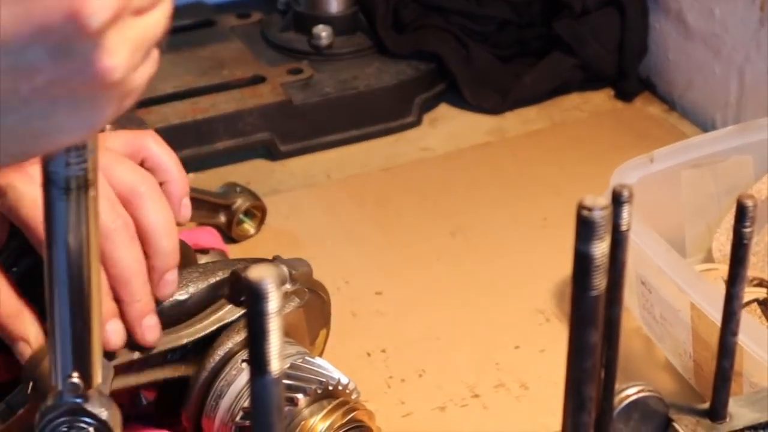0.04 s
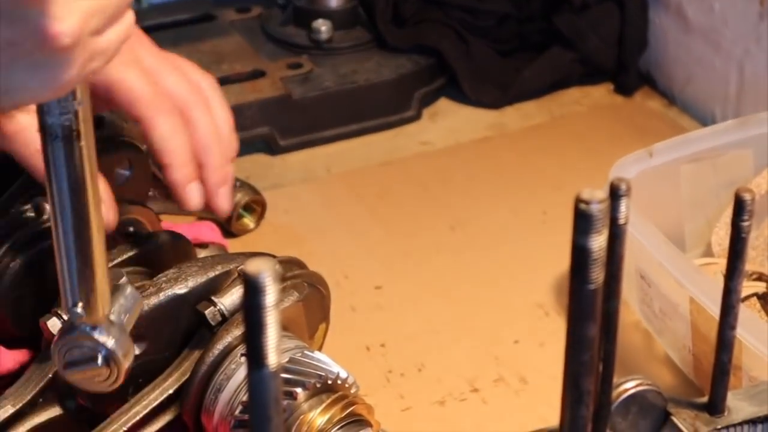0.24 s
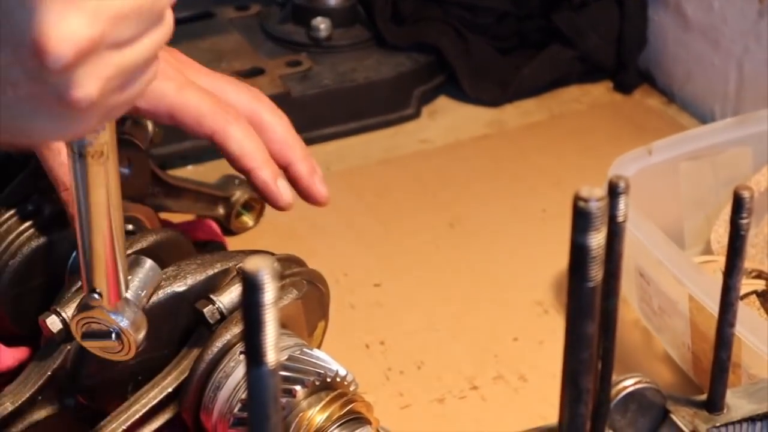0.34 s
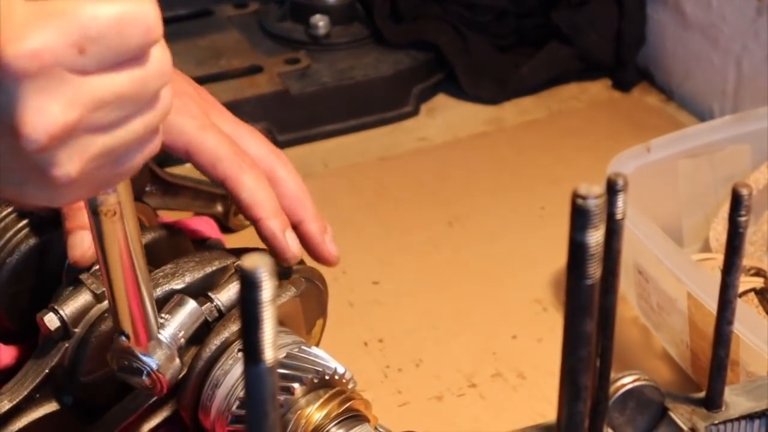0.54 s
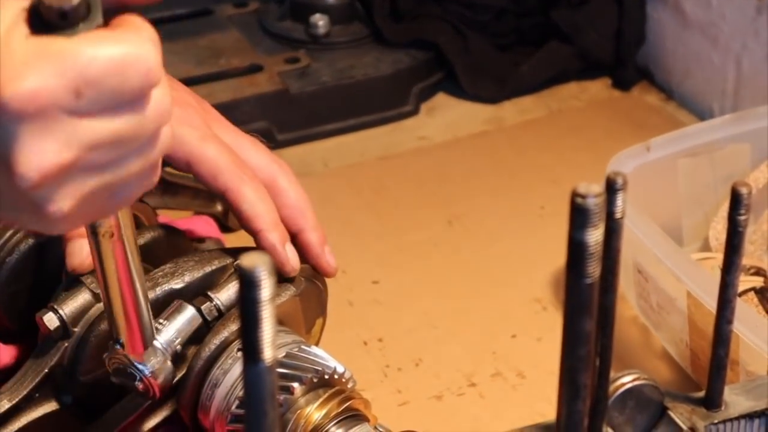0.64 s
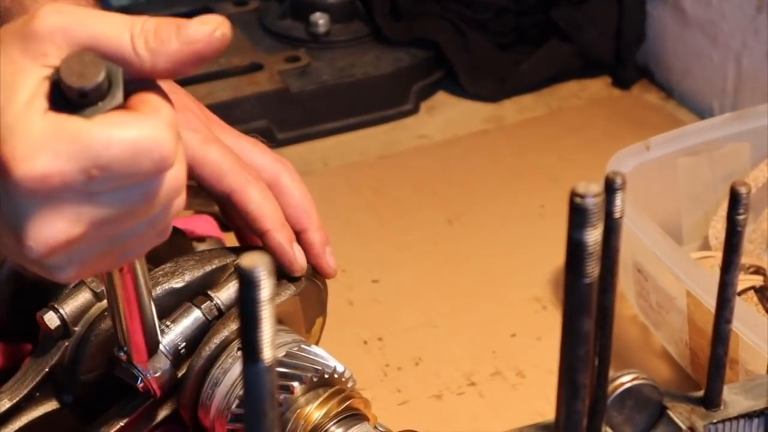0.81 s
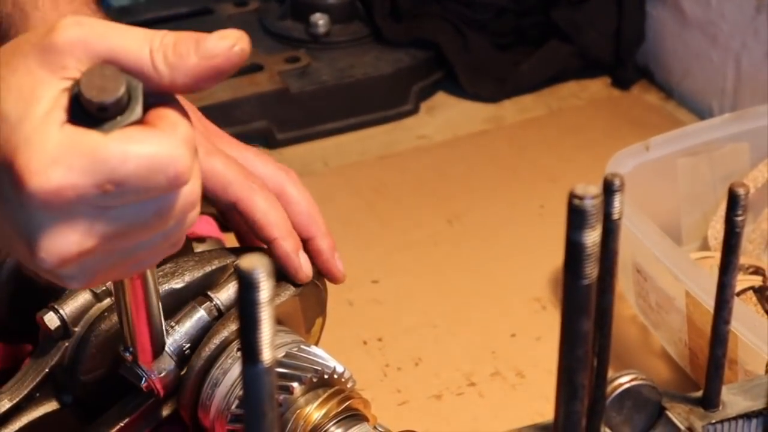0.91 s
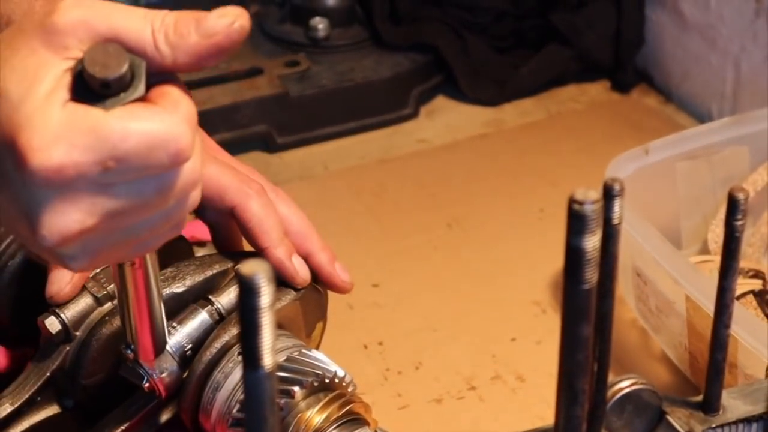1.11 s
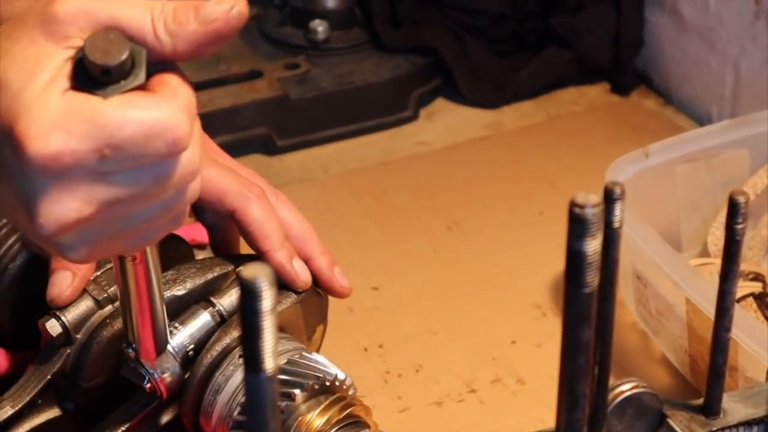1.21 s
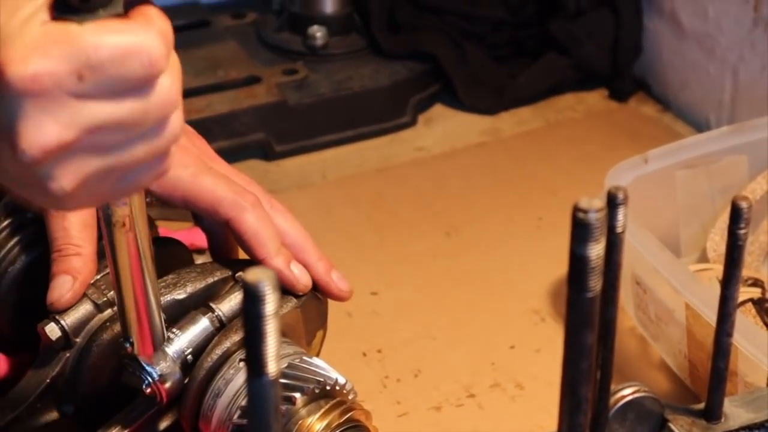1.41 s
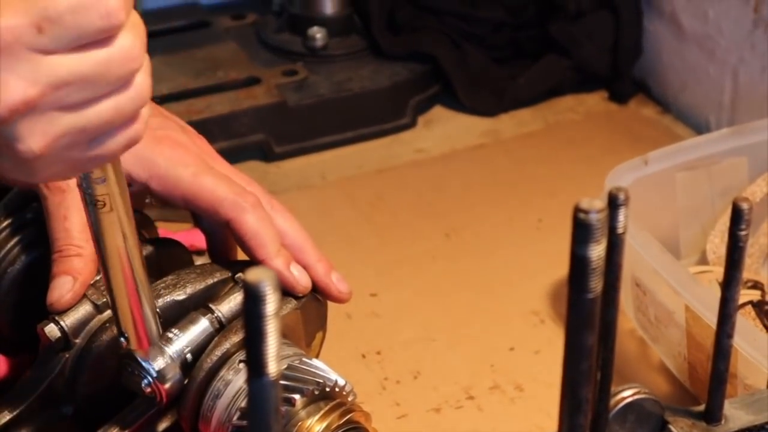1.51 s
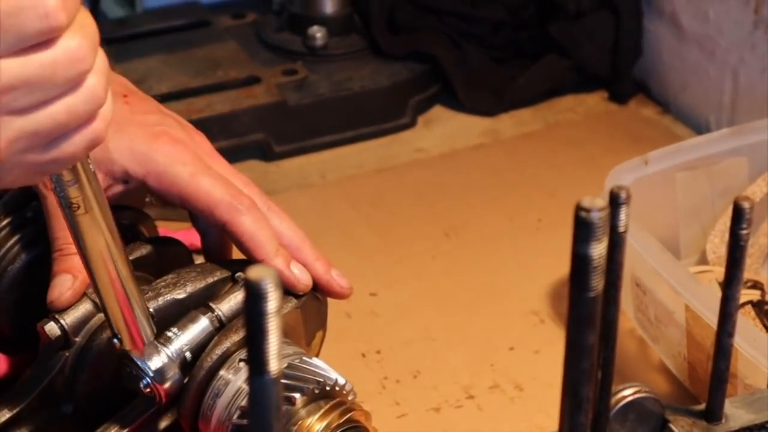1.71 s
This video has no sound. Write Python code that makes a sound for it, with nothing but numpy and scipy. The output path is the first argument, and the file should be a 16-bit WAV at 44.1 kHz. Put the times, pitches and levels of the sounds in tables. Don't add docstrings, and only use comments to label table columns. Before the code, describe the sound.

Heavy steel part thuds onto a wooden bench, then a socket scrapes and a wrench clicks

```python
import sys
import numpy as np
from scipy import signal
from scipy.fft import rfft, irfft
from scipy.io import wavfile
from scipy.ndimage import uniform_filter1d

SR = 44100
rng = np.random.default_rng(int(sys.argv[2]) if len(sys.argv) > 2 else 0)


def invert_db(level):
    return 10 ** (np.asarray(level, dtype=float) / 20)


def store_wav(level_fs):
    pcm = np.round(np.clip(np.atleast_2d(level_fs), -1, 1) * 32767)
    wavfile.write(sys.argv[1], SR, pcm.T.astype(np.int16))


N = 77175
t = np.arange(N) / SR


def curve(table, col=1):
    a = np.array(table, float)
    return np.interp(t, a[:, 0], a[:, col])


def unit(x):
    return x / np.sqrt(np.mean(x ** 2))


def cut(x, order, hz, kind="low"):
    return signal.sosfilt(signal.butter(order, hz, kind, fs=SR, output="sos"), x)


def ring(x, hz, t60_s):
    pole = np.exp(2j * np.pi * hz / SR - np.log(1000) / (t60_s * SR))
    return signal.lfilter([1], [1, -pole], x).imag


def body(x, modes):
    return sum(invert_db(db) * ring(x, hz, t60_s) for hz, db, t60_s in modes)


def colour(x, table):
    a = np.array(table, float)
    f = np.arange(N // 2 + 1) * SR / N + 1
    gain_db = np.interp(np.log(f), np.log(a[:, 0]), a[:, 1])
    return irfft(rfft(x) * invert_db(gain_db), N)


def walk(rate_hz):
    k = int(SR / rate_hz)
    steps = np.repeat(rng.standard_normal(N // k + 1), k)
    return unit(uniform_filter1d(uniform_filter1d(steps, k), k)[:N])


def grains(per_s, scatter_db):
    when, sign, size = rng.random((3, N))
    level_db = scatter_db * np.minimum(-np.log(size + 1e-9), 3.5)
    return (when < per_s / SR) * np.sign(sign - .5) * invert_db(level_db)


def push(s, ms):
    p = np.sin(np.pi * np.clip((t - s) / (ms / 1000), 0, 1))
    return p / p.sum()


def burst(s, ms):
    return (t >= s) * np.exp(-np.maximum(t - s, 0) / (ms / 1000))


# f/Hz, level/dB per Hz
SHOP = [(35, -60), (60, -9.5), (119, -20), (246, -12), (318, -20.5), (983, -13), (2140, -33), (15000, -45),
        (16500, -54)]


def room_tone():
    level_db, flicker_db = -44, 0.24
    f = np.arange(N // 2 + 1) * SR / N + 1
    base = rfft(colour(rng.standard_normal(N), [(15, -11.0), (45, -34.0)] + list(SHOP)))
    out = np.zeros(N)
    for hz in 16 * 2. ** np.arange(11):
        band = np.cos(np.pi / 2 * np.clip(np.log2(f / hz), -1, 1)) ** 2
        out += irfft(base * band, N) * invert_db(flicker_db * walk(6.95))
    return unit(out) * invert_db(level_db)


def hum():
    mains_hz, level_db, wobble_db, second_db = 50, -49.2, 1.1, -14
    phase = 2 * np.pi * mains_hz * t + 0.052 * walk(6.5)
    wave = np.sin(phase) + invert_db(second_db) * np.sin(2 * phase)
    return 2 ** .5 * invert_db(level_db + wobble_db * walk(11.3)) * wave


# t/s, level/dB
RUSTLE = [(0, -69), (.045, -44), (.09, -50), (.165, -43), (.21, -46), (.26, -34), (.32, -45), (.42, -50),
          (.7, -96), (.9, -53), (1.0, -44), (1.15, -53.5), (1.3, -52), (1.75, -99)]
# f/Hz, level/dB per Hz
RUSTLE_COLOUR = [(800, 11.5), (1700, 10.5), (3000, 2.5), (4200, 0), (5400, 1.5), (7000, -14), (16000, -15)]


def rustle():
    grain_per_s, scatter_db, flicker_db = 6000, 2.4, 1.2
    cloth = unit(colour(grains(grain_per_s, scatter_db), RUSTLE_COLOUR))
    return cloth * invert_db(curve(RUSTLE) + flicker_db * walk(38.9))


TICKS_S = [.0425, .1984, .2008, .2832, .3306, .7932, .8035, .8065, .8160, .8541, .9482, .9492, .9505, .9530,
           .960, .982, 1.2855, 1.595, 1.721]
# level/dB, low clack f/Hz, high clack f/Hz, chatter/ms, ring level/dB
TICKS = [(-42.5, 1500, 2100, 9.9, -17), (-18, 3640, 5220, 0.84, -32), (-21, 2540, 4530, 1.8, -30),
         (-30, 4000, 5620, 2.1, 7), (-38.5, 4150, 4320, 3.1, -22), (-29, 3200, 5600, 0.47, 0),
         (-27.5, 2880, 4700, 0.53, -30), (-35, 1920, 4600, 2.7, -10), (-30.5, 3830, 5600, 1.4, 3),
         (-33, 2600, 3300, .5, -16), (-27, 2700, 3600, .7, 0), (-25, 3150, 5700, .6, 0),
         (-35, 4540, 7200, 3, -3), (-29, 1100, 1600, 2.5, 2), (-39, 3080, 5500, 4, -6),
         (-42, 2800, 5400, 3, -10), (-46.5, 2830, 3280, 3.2, -12), (-54, 2600, 3600, 1.5, -20),
         (-50.5, 2200, 3300, 4.7, -20)]
# f/Hz, level/dB, t60/s
STEEL = [(930, -4, .05), (1272, 2, .04), (1870, -14, .03), (2650, 8, .018), (3080, -6, .03),
         (3616, -2, .04), (4200, -10, .02), (4540, 0, .018), (5400, 0, .022), (5610, -8, .03),
         (6350, -6, .012), (7700, -2, .018), (8230, -6, .02), (9800, -5, .02)]
# f/Hz, level/dB per Hz
SNAP = [(600, -8), (1500, -3), (2300, -6), (3200, 2), (6000, 1), (10000, -6), (12000, -18), (16000, -22)]


def ticks():
    rise_ms, clack_t60_s, ring_octaves = .15, .0055, .4
    snap_db, snap_hz = -.5, 5470
    out = np.zeros(N)
    noise = np.sign(rng.standard_normal(N)) * rng.uniform(0.7, 1, N)
    for s, (db, low_hz, high_hz, ms, ring_db) in zip(TICKS_S, TICKS):
        a = int(s * SR) - 40
        span = slice(a, a + 6000)
        chatter = noise * (burst(s, ms) - burst(s, rise_ms))
        hit = chatter[span]
        snap = unit(colour(chatter, SNAP)[span])
        clack, tone = 0, 0
        for hz in (low_hz, high_hz):
            clack = clack + unit(ring(ring(hit, hz, clack_t60_s), hz, clack_t60_s))
        for hz, mode_db, t60_s in STEEL:
            octaves = min(abs(np.log2(hz / low_hz)), abs(np.log2(hz / high_hz)))
            near_db = mode_db - 10 * (octaves / ring_octaves) ** 2
            tone = tone + invert_db(near_db) * ring(hit, hz, t60_s)
        y = clack + invert_db(ring_db) * unit(tone) + invert_db(snap_db) * (high_hz / snap_hz) ** 2 * snap
        out[span] += y * invert_db(db + 8) / np.abs(y).max()
    return out


# t/s, level/dB
CRACKS = [
    (0.1983, -3.5),
    (0.2851, -24.5),
    (.3305, -32),
]


def cracks():
    level = sum(invert_db(db) * burst(s, 0.3) for s, db in CRACKS)
    return cut(rng.standard_normal(N) * level, 2, 11000)


# t/s, level/dB, contact/ms
BLOWS = [(.1984, -.7, .15), (.2008, -2.3, 5.7), (.2088, -18, 1.3), (.2241, -31, .7), (.2326, -32, 1.2),
         (.238, -19.6, 2.5), (.2463, -13.6, 6), (.252, -23, 2), (.2591, -22.6, 2.9), (.2651, -29.4, 2.1),
         (.2689, -16.8, 1.9), (.2836, -12.5, 1.05), (.2839, -23, .3), (.2967, -25, 2.2), (.3048, -29, 1.1),
         (.3092, -11.7, 7.2), (.3216, -19.6, 6.8), (.3299, -14.2, 1.9), (.3305, -29, .4),
         (.3326, -14.8, 4.4), (.3571, -21, 1.7), (.3589, -14.7, 6.1), (.3758, -30.6, 2), (.4074, -37, 2),
         (.4272, -37.6, 2.3), (.4447, -35, 2.9)]
# t/s, level/dB, contact/ms
JOLTS = [
    (0.815, -34, 2.7),
    (0.832, -29, 4.9),
    (0.9547, -38.5, 0.46),
    (.998, -41, 3.7),
]
# f/Hz, level/dB, t60/s
BENCH = [(140, 1.2, .078), (180, -3.1, .093), (204, -10, .12), (250, -7, .03), (276, -20, .3),
         (342, -20, .15), (422, -6, .06), (458, -10, .06), (517, -2.8, .074), (547, .9, .029),
         (604, .5, .023), (678, -14.3, .097), (1052, -15, .07),
         (780, -18, 0.025), (1360, -11, 0.02), (2010, -22, 0.028), (2480, -29, .012)]
# f/Hz, level/dB, t60/s
FRAME = [(79, -17, .6), (98, -3.7, .39), (124, -23.5, .4), (129, -16, .33)]


def knocks():
    hits = BLOWS + JOLTS
    top = sum(invert_db(db) * push(s, ms) for s, db, ms in hits)
    frame = sum(invert_db(db) * push(s, 12.9) for s, db, ms in hits)
    return body(top, BENCH) + body(frame, FRAME)


# t/s, level/dB
ROCKING = [(.205, -24), (.225, -18.5), (.27, -19), (.295, -19.5), (.33, -24), (.375, -26), (.39, -35),
           (.45, -36), (.5, -44)]
# f/Hz, level/dB, t60/s
SHUDDER = [(80, 2, .2), (106, 1, .15), (216, 0, .06), (255, 8, .045), (300, 5, .05), (360, 2, .06),
           (405, 0, .06), (740, -2, .03), (870, -2, .04), (988, -3, .04), (1150, -4, .03), (1530, -10, .02)]


def rocking():
    tap_per_s, scatter_db, tap_ms = 440, 1.9, 0.41
    soft = np.hanning(int(tap_ms * SR / 1000) + 2)
    taps = np.convolve(grains(tap_per_s, scatter_db), soft)[:N]
    gate = (t > .208) * np.clip((.56 - t) / 0.19, 0, 1)
    return unit(body(taps, SHUDDER)) * invert_db(curve(ROCKING) - 2) * gate


def bench():
    return cut(knocks() + rocking(), 4, 81.4, "high") + cracks()


# t/s, skitter level/dB, rub level/dB
DRAG = [(.41, -39.5, -42), (.44, -51.5, -50), (.455, -46, -47), (.475, -38, -43.5), (.51, -37, -40.5),
        (.532, -31, -31.5), (.56, -37, -33), (.6, -56.5, -52), (.66, -79, -80)]
# f/Hz, width/Hz, level/dB
DRAG_BODY = [(920, 60, 12), (1213, 130, 16), (1514, 210, 17.5), (1730, 400, 17)]
# f/Hz, level/dB per Hz
DRAG_WIDE = [(700, -14.5), (2000, 5.5), (2900, 0), (3700, -1), (4600, -10), (5400, -8.5), (8000, -22),
             (16000, -30.5)]


def rub(g):
    socket = sum(invert_db(db) * np.sqrt(w) * ring(g, hz, 5.9 / w) for hz, w, db in DRAG_BODY)
    dull = unit(socket) * invert_db(curve(DRAG, 2) + 2.5)
    bright = unit(colour(g, DRAG_WIDE)) * invert_db(curve(DRAG) + 4.5)
    fade = np.clip((t - .385) / 0.065, 0, 1) * np.clip((.69 - t) / 0.085, 0, 1)
    return (dull + bright) * invert_db(0.4 * walk(89.3)) * fade


SLIPS_S = [.405, .4561, .4612, .4731, .4755, .501, .5455]
SLIPS = [-42, -20, -24.5, -16, -28, -35, -33]


def slips():
    force = sum(invert_db(db) * push(s, 0.25) for s, db in zip(SLIPS_S, SLIPS))
    click = cut(4.7 * force, 2, 900, "high")
    return click + 1.0 * ring(force, 1700, 0.0034) + 1.26 * ring(force, 4240, 0.0037)


def creak(g):
    start_s, end_s, fade_s = 0.99, 1.196, 0.053
    fade = np.clip(np.minimum(t - start_s, end_s - t) / fade_s, 0, 1)
    return unit(ring(g, 1720, 0.12)) * invert_db(-55) * fade


def drag():
    g = grains(17000, 0.5)
    return rub(g) + slips() + creak(g)


def room(x, db, t60_s):
    k = t[100:int(.5 * SR)]
    wash = cut(rng.standard_normal(len(k)), 1, 4300) * 1000. ** (-k / t60_s)
    ir = np.r_[np.zeros(100), wash / np.sqrt(np.sum(wash ** 2))]
    return signal.fftconvolve(x, ir)[:N] * invert_db(db)


def scene():
    steel = ticks()
    near = bench() + steel + drag()
    tick_tail = room(steel, -13, 0.05)
    reflections = room(cut(near, 2, 550, "high"), -15.5, 0.15)
    air = room_tone() + hum() + rustle()
    return (near + tick_tail + reflections + air)[None]


def band_limit(x):
    return signal.sosfilt(signal.butter(12, 16830, fs=SR, output="sos"), x)


def record(dry):
    duck_db, duck_over_db, duck_s = -5, -24, .03
    k = np.exp(-1 / (duck_s * SR))
    loud = np.sqrt(signal.lfilter([1 - k], [1, -k], dry ** 2))
    gain = invert_db(duck_db * loud / (loud + invert_db(duck_over_db)))
    return band_limit(np.clip(dry * gain, -.97, .97))


dry = scene()
out = record(dry)
store_wav(out)
```